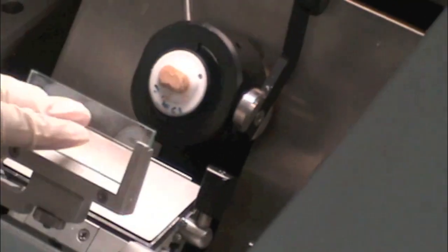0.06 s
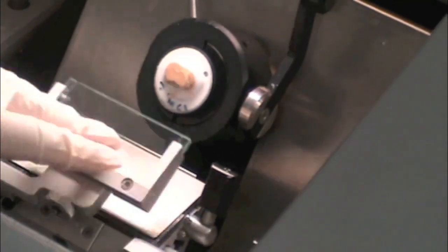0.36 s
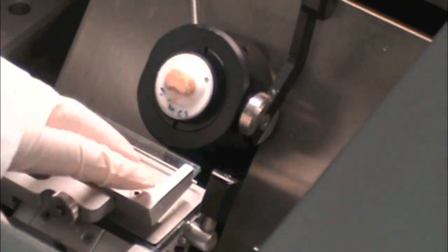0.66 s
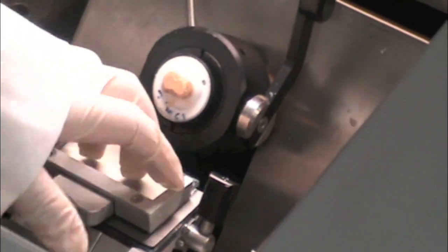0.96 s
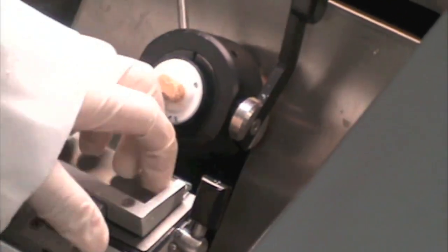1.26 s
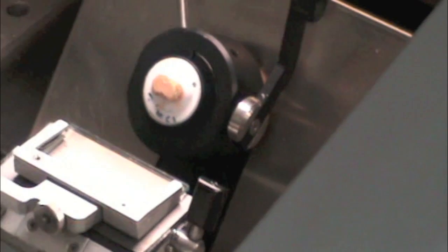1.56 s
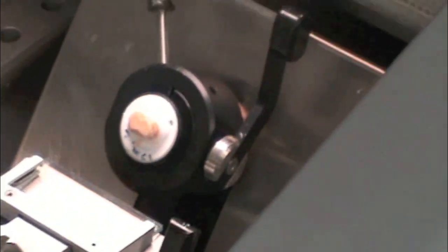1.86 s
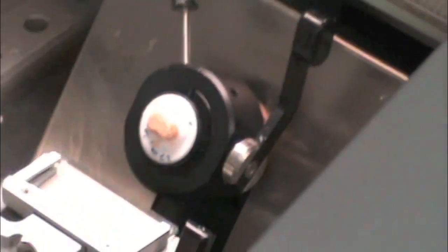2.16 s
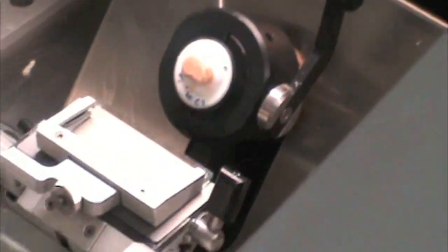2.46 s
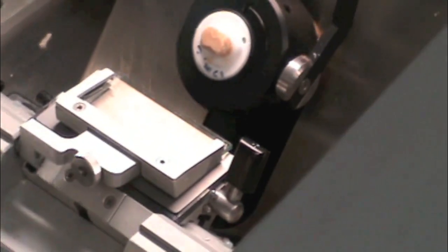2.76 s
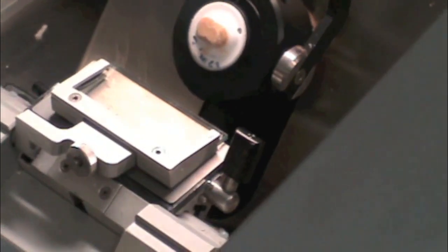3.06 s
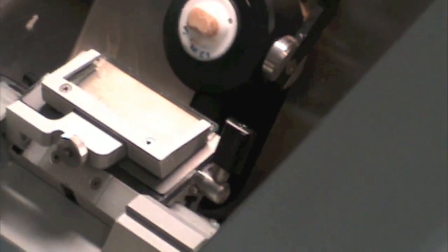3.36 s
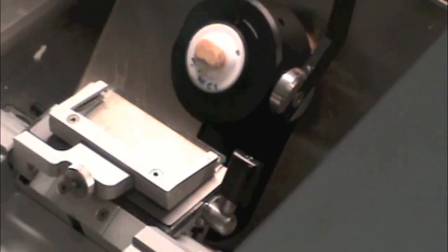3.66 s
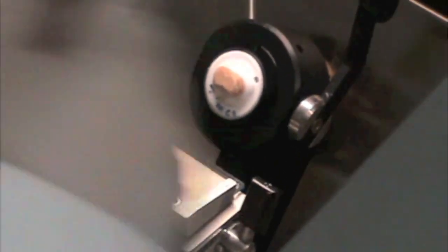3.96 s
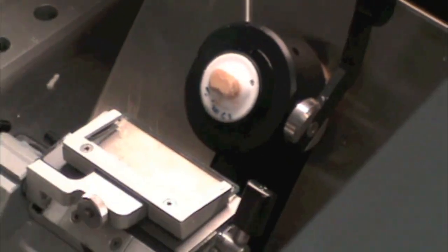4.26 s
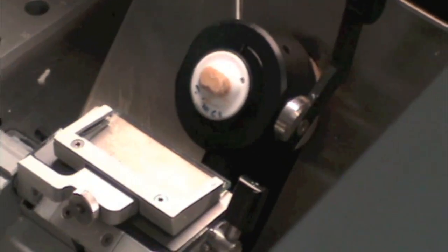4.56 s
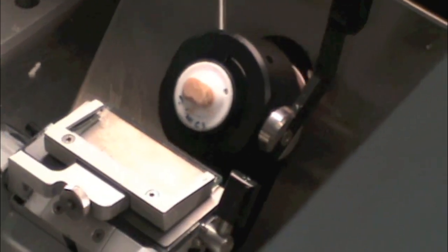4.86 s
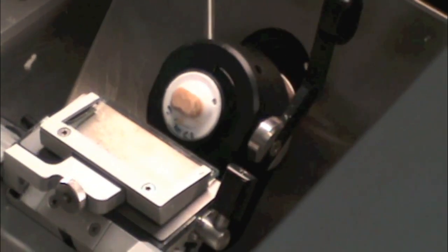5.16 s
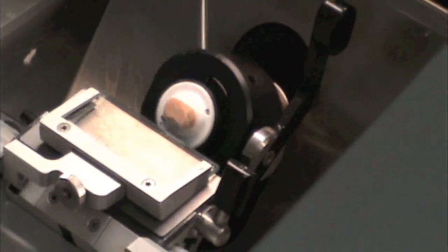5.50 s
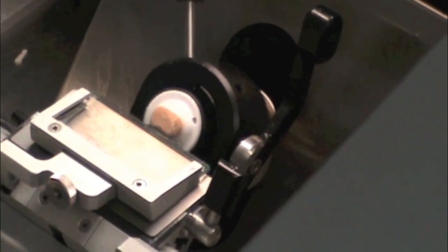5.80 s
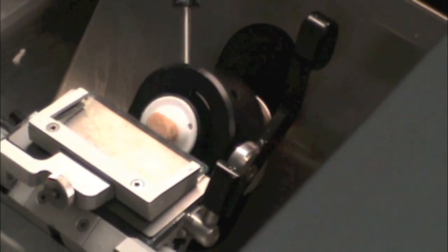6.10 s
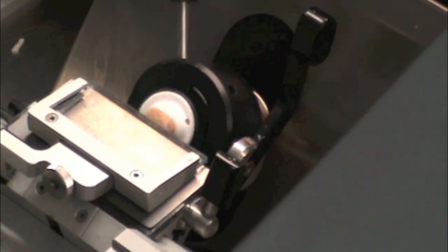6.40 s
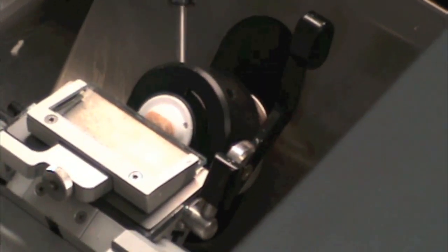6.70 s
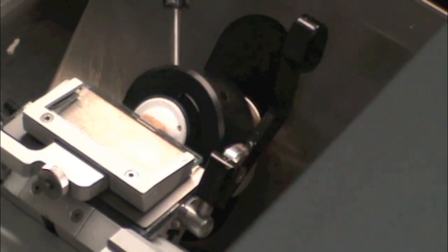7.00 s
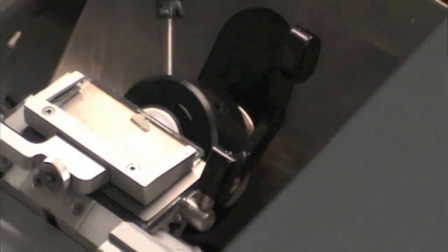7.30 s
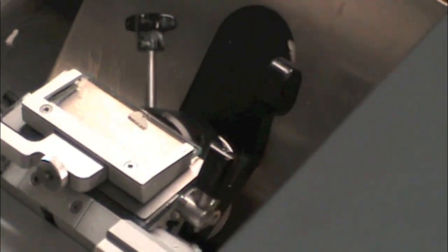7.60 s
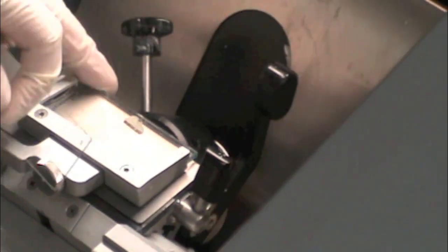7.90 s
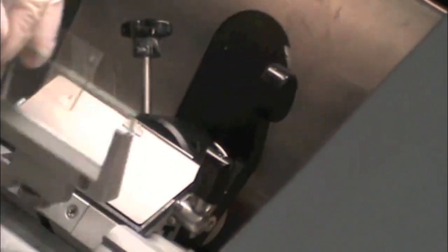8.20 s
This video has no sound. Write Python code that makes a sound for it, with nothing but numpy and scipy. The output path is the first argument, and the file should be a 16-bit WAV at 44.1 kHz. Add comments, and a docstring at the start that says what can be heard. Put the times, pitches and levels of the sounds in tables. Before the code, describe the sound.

A refrigerated lab slicing machine runs steadily, with a wavering low drone, thin high whines and rushing fan air. Near the start a small hinged plate is laid down with a squeaky click. A few faint ticks, rubs and chirps follow, with one squeak and soft knock midway. At the end the plate lifts with a brief shriek and rattle. One nearby microphone in a small lab.

```python
"""A small lab, one microphone by a cryostat. Its compressor drones and whines; a fan moves air through
the cabinet. A gloved hand lays the anti-roll plate on the blade holder, turns the wheel to cut one slice
and lifts the plate again. Glove, plate and slide rub, tick and squeak as they catch and slip; at the
end the hinge shrieks and the plate rattles. The handling rings briefly in the steel chamber."""
import sys
import numpy as np
from scipy import signal
from scipy.fft import rfft, irfft, next_fast_len
from scipy.io import wavfile

SR = 44100
rng = np.random.default_rng(int(sys.argv[2]) if len(sys.argv) > 2 else 0)


def file_out(sig):
    """Save sig as 16-bit WAV at sys.argv[1]."""
    # one column per channel
    cols = np.atleast_2d(sig).T
    # limit, then scale
    lim = np.clip(cols, -1, 1)
    pcm = np.round(lim * 32767).astype(np.int16)
    wavfile.write(sys.argv[1], SR, pcm)


N = 372644
TIME = np.arange(N) / SR
CUTOFF_HZ = 15700


def from_db(db):
    """Decibels to gain."""
    return 10 ** (np.asarray(db) / 20)


def rms_one(x):
    """Scale to an rms of one."""
    return x / np.sqrt(np.mean(x ** 2) + 1e-20)


def at_hz(points, hz):
    """Read a spectrum on a log-frequency axis."""
    known_hz, db = np.transpose(points)
    return np.interp(np.log(np.maximum(hz, 1)), np.log(known_hz), db)


def in_time(points):
    """Read a level curve at every sample."""
    return np.interp(TIME, *np.transpose(points))


def drift(rate, size=N):
    """A smooth random wander with a spread of about one and `rate` turns a second."""
    place = np.arange(size) / SR * rate + rng.random()
    knots = np.sqrt(3) * rng.uniform(-1, 1, int(size / SR * rate) + 3)
    step = place.astype(int)
    ease = (place - step) ** 2 * (3 - 2 * (place - step))
    return knots[step] * (1 - ease) + knots[step + 1] * ease


def resonate(x, hz, width_hz, passes=1):
    """Ring one resonance with a peak gain of one, `passes` times in series."""
    r = np.exp(-np.pi * width_hz / SR)
    feedback = [1, -2 * r * np.cos(2 * np.pi * hz / SR), r * r]
    for _ in range(passes):
        x = signal.lfilter(np.array([1, 0, -1]) * (1 - r * r) / 2, feedback, x)
    return x


def contact(length_s, edge=0.19):
    """Envelope of one contact: it takes hold, holds and lets go; rms one."""
    t = np.arange(int(length_s * SR)) / SR
    ramp = np.clip(np.minimum(t, length_s - t) / (edge * length_s), 0, 1)
    return rms_one(np.sin(np.pi / 2 * ramp) ** 2)


def add(out, start_s, sound):
    """Mix a sound in at start_s."""
    span = out[int(start_s * SR):][:len(sound)]
    span += sound[:len(span)]


def chamber(x, t60_s=0.17, build_up_s=0.0055, wall_hz=7000):
    """Echoes between the steel walls build up and die quickly, a little duller than the direct sound."""
    t = TIME[:SR // 2]
    echoes = rng.standard_normal(len(t)) * from_db(-60 * t / t60_s) * np.minimum(t / build_up_s, 1) ** 2
    walls = signal.butter(1, wall_hz, fs=SR, output="sos")
    return signal.fftconvolve(x, signal.sosfilt(walls, echoes / np.linalg.norm(echoes)))[:N]


def fan(exposure_db, rush_db=-47.5, flutter_db=1.16):
    """Turbulent air rushes and stirs the cabinet; a low band of noise rises and falls irregularly."""
    # moving air: frequency_hz, relative_density_db
    air_spectrum = [(20, -26), (80, -19.5), (112, -16.5), (160, -3), (330, 0), (490, -7.5), (1000, -10),
                    (1600, -17), (2100, -18), (3000, -23.5), (4200, -32), (7700, -34), (11500, -35),
                    (15000, -53.5)]
    # cabinet resonances: pitch_hz, width_hz, base_level_db
    cabinet_modes = [(260.3, 9.5, -61), (329.7, 14.2, -57), (418.8, 7.2, -56.5), (595, 15.5, -60.5),
                     (639.6, 13.8, -58.5), (2065, 64, -65.5), (6760, 270, -72), (8620, 150, -78),
                     (9760, 100, -80), (14250, 250, -99)]
    # low band of noise near 170 Hz: time_s, level_db
    low_band_curve = [(0, -52), (.45, -69), (.9, -51.5), (1.25, -69), (1.6, -51), (1.95, -64.5),
                      (2.95, -52), (3.7, -60.5), (4.6, -57), (6, -66.5), (6.7, -57), (7.7, -71),
                      (8.3, -51.5)]
    size = next_fast_len(N)
    colour = from_db(at_hz(air_spectrum, np.fft.rfftfreq(size, 1 / SR)))
    rush = rms_one(irfft(rfft(rng.standard_normal(size)) * colour, size)[:N])
    turbulence = rng.standard_normal(N)

    def stirred(hz, width_hz):
        """One narrow band of the turbulence; rms one."""
        return rms_one(resonate(turbulence, hz, 2 * width_hz, passes=2))

    rings = sum(from_db(db) * stirred(hz, width) for hz, width, db in cabinet_modes)
    low_band = from_db(in_time(low_band_curve)) * stirred(hz=169.2, width_hz=13)
    return from_db(exposure_db + flutter_db * drift(10)) * (from_db(rush_db) * rush + rings) + low_band


def hum():
    """Steady low hum of the mains, the fan and the compressor's half-speed tone."""
    # hum tones: pitch_hz, level_db
    tones = [(29.5, -95), (120, -70), (149, -64), (360, -59.5)]
    return sum(np.sqrt(2) * from_db(db) * np.sin(2 * np.pi * (hz * TIME + rng.random()))
               for hz, db in tones)


def leading_whines(turns, throb, flutter_db=1.8):
    """Five high shaft harmonics flutter and shift in level with the microphone's position."""
    # whines near 2.7, 5.1, 6.8, 8.5 and 9.7 kHz, each: time_s, base_level_db
    low = [(0, -62.5), (.65, -63), (1.3, -64.5), (1.8, -71.5), (3.2, -67), (4.4, -69), (5.3, -74),
           (8.2, -75)]
    mid = [(0, -87), (.6, -79), (1.2, -69.5), (1.9, -81), (2.1, -66.5), (4.9, -69.5), (6, -73.5),
           (6.8, -73.5), (8, -75)]
    high = [(0, -67), (.5, -60), (1.3, -67.5), (1.5, -70), (2, -71), (2.25, -65.5), (4.5, -66), (6.1, -73),
            (7.5, -71), (8.2, -65)]
    shrill = [(0, -71), (.8, -64), (1.6, -73), (2.1, -69.5), (4.9, -70), (5.3, -77), (6, -88), (6.6, -80),
              (7.4, -73), (8.2, -69)]
    thin = [(0, -75), (1.65, -88), (1.85, -70), (3.9, -82), (5.2, -76), (8.2, -74)]

    def whine(harmonic, curve, throb_depth):
        """One tone locked to the shaft."""
        gain = np.sqrt(2) * from_db(in_time(curve) + flutter_db * drift(16)) * (1 + throb_depth * throb)
        return gain * np.sin(2 * np.pi * (harmonic * turns + rng.random()))

    return (whine(46, low, 0) + whine(87, mid, .24) + whine(116, high, .05)
            + whine(145, shrill, .1) + whine(164, thin, .15))


def compressor(exposure_db, shaft_hz=58.94, mains_hz=60, wobble_hz=0.0146, throb_peak_s=4.42,
               wander=0.23, uneven_db=7.5, waver_db=2.2):
    """Every piston stroke shakes the shell alike, making a buzz whose partials waver and throb."""
    # outline of the buzz: frequency_hz, base_level_db
    buzz_spectrum = [(59, -79), (180, -72), (400, -59), (650, -108), (800, -71.5), (1300, -82.5),
                     (2200, -86), (3100, -101), (3900, -90), (5800, -99), (6700, -92), (9700, -99),
                     (11400, -100), (12800, -99), (15000, -115)]
    # partials on a resonance of shell or panels: harmonic, base_level_db
    drone_partials = [(3, -67), (5, -52), (6, -64), (7, -69), (9, -68.5), (10, -73), (11, -73.5)]
    # high partials that the shell favours: harmonic (the nearest is used), base_level_db, throb_depth
    whine_partials = [(33, -68.5, 0.1), (34, -74, 0), (35, -72.5, 0.14), (36, -87, 0), (43, -67.5, 0),
                      (76.1, -79, 0.04), (79.3, -84, 0.2), (81, -85, 0.5), (83.5, -76, 0), (85.9, -77, 0.1),
                      (91.4, -77.5, 0), (108, -92, 0.2), (112, -76, 0.1), (113.6, -69.5, 0), (120, -79, 0),
                      (126, -80.5, 0), (140, -82, 0.1), (142, -82, 0.2), (146.2, -77, 0), (151, -86, 0.1),
                      (164, -89, 0.3), (166, -86, 0.2), (168, -84, 0), (193, -85, 0.4), (194, -78.5, 0),
                      (196, -86, 0.2)]
    # swell of the strongest partial: time_s, gain_db
    drone_curve = [(0, 8), (.2, 3.5), (.43, -13), (.58, 13), (.9, 1.5), (1.08, 0.5), (1.8, -7), (2.0, 5),
                   (2.25, -10), (2.65, -5), (3.5, -4), (4.25, -0.5), (4.45, 2), (5.1, -1.5), (5.3, 3),
                   (5.6, -2.5), (6.15, -7), (6.35, 1), (7.0, 0.5), (7.6, -7), (7.95, 1.5), (8.35, 3.5)]
    drone_db = in_time(drone_curve) + waver_db * drift(9)
    harmonics = np.arange(1, 255)
    hz = harmonics * shaft_hz
    level_db = at_hz(buzz_spectrum, hz) + uneven_db * (2 * rng.random(len(hz)) - 1)
    throb_depth = np.full(len(hz), .3)
    for harmonic, db in drone_partials:
        level_db[np.argmin(abs(harmonics - harmonic))] = db
    for harmonic, db, depth in whine_partials:
        nearest = np.argmin(abs(harmonics - harmonic))
        level_db[nearest], throb_depth[nearest] = db, depth
    partials = from_db(level_db) * np.exp(2j * np.pi * rng.random(len(hz)))
    turns = np.cumsum(shaft_hz + wobble_hz * drift(5)) / SR
    throb_hz = 2 * (mains_hz - shaft_hz)   # the motor lags behind the mains
    throb = np.cos(2 * np.pi * throb_hz * (TIME - throb_peak_s))

    def cycle(weights, size=4096):
        """Repeat one stroke at the speed of the shaft."""
        shape = irfft(np.r_[0, weights], size) * size / np.sqrt(2)
        return np.interp(turns % 1 * size, np.arange(size + 1), np.r_[shape, shape[0]])

    def wavering(weights):
        """A steady stroke plus two copies with random phases that come and go."""
        changes = sum(cycle(weights * np.exp(2j * np.pi * rng.random(len(weights)))) * drift(7)
                      for _ in range(2))
        return cycle(weights) + wander * changes

    def throbbing(weights):
        """Each partial swells with the motor's slip by its own depth."""
        return wavering(weights) + throb * cycle(weights * throb_depth)

    # the strongest partial stands in the room and the high ones beam, so they change with position
    strongest, high = harmonics == 5, hz > 2400
    drone = from_db(drone_db) * wavering(partials * strongest)
    whine = from_db(exposure_db) * throbbing(partials * high) + leading_whines(turns, throb)
    buzz = throbbing(partials * ~(strongest | high))
    return drone + whine + buzz


def rubs(catches_per_s=7000, spread_db=5.5):
    """Tiny catches of two surfaces ring the holder; soft contacts reach only its low modes."""
    # glove, sleeve and parts rubbing: start_s, length_s, level_db, low_hz, high_hz
    strokes = [(0.412, 0.049, -36.5, 2750, 3300), (0.424, 0.033, -38.5, 2400, 2780),
               (0.425, 0.027, -44, 8000, 9800), (0.438, .012, -53, 13600, 14800),
               (.44, .018, -56, 10300, 11200), (1.783, 0.066, -62, 1500, 5000),
               (2.075, 0.033, -48, 1000, 1980), (2.075, 0.031, -60, 3200, 9600),
               (2.076, 0.0085, -56.5, 3000, 9400), (3.243, 0.038, -63.5, 3000, 10000),
               (3.293, 0.022, -63.5, 5230, 6600), (4.241, 0.052, -51.5, 500, 1910),
               (4.272, .02, -62, 5500, 7000), (4.411, 0.036, -41.5, 845, 1360),
               (4.421, .02, -41, 2130, 2530), (4.419, .02, -57, 2750, 2950),
               (4.848, 0.026, -53.5, 500, 1500), (7.623, 0.049, -51, 550, 1500),
               (8.13, 0.34, -48, 148, 263), (8.321, .025, -41, 12600, 14200),
               (8.337, 0.023, -39, 3000, 3400), (8.357, 0.045, -41, 2870, 3600),
               (8.362, 0.027, -37.5, 5000, 9600), (8.361, 0.066, -36.5, 1470, 1800),
               (8.387, .04, -44, 7500, 9600), (8.357, 0.038, -55, 12400, 14600)]
    # modes of the blade holder and its plate: pitch_hz, width_hz, gain_db
    holder_modes = [(600, 220, 3), (994, 104, 8), (1366, 140, 7), (1780, 720, 8), (2220, 590, 8),
                    (3170, 200, 8.5), (5000, 510, 4), (6750, 610, 1), (7800, 890, 3), (8800, 910, 6),
                    (10900, 630, 2.5), (13600, 380, -10), (14200, 1100, -14)]
    out = np.zeros(N)
    for start_s, length_s, db, low_hz, high_hz in strokes:
        envelope = contact(length_s)
        n = len(envelope)
        catches = (rng.random(n) < catches_per_s / SR) * rng.choice([-1, 1], n)
        strength = from_db(spread_db * (2 * rng.random(n) - 1))
        force = np.r_[catches * strength * envelope, np.zeros(512)]   # time to ring out
        body = sum((-1) ** k * from_db(mode_db) * resonate(force, hz, width)
                   for k, (hz, width, mode_db) in enumerate(holder_modes))
        sound = signal.sosfilt(signal.butter(2, [low_hz, high_hz], "band", fs=SR, output="sos"), body)
        add(out, start_s, from_db(db) * rms_one(sound) * np.sqrt(len(sound) / n))
    return out


def ticks():
    """Small contacts: each swells and dies on one note, the high ones at once, the low one slower."""
    # taps of plate, fingers and slide: start_s, pitch_hz, peak_db, rise_s
    taps = [(0.4266, 3100, -34, 0.0014), (0.4364, 2320, -25, 0.0011), (.4425, 3100, -35, .0006),
            (0.4422, 9000, -27, .0004), (.448, 4800, -33, .0012), (.971, 4350, -51, .0008),
            (1.192, 4330, -34.5, 0.0018), (1.199, 4500, -35.5, .001), (1.902, 5500, -40, 0.00094),
            (3.263, 9300, -54, 0.00045), (3.315, 4280, -47, .0005), (3.322, 4000, -47, .0005),
            (4.441, 595, -30.5, 0.01), (7.987, 4800, -51, .001)]
    out, t = np.zeros(N), TIME[:SR // 10]
    for start_s, hz, db, rise_s in taps:
        envelope = t / rise_s * np.exp(1 - t / rise_s)
        add(out, start_s, from_db(db) * envelope * np.sin(2 * np.pi * hz * t))
    return out


def stick_slip(length_s, hz, roughness, fall_db, grip_db, grips_per_s=300, glide_octaves=0, swell_db=0):
    """Surfaces stick and slip: an unsteady pitch with falling overtones under an uneven grip."""
    envelope = contact(length_s)
    size = len(envelope)
    progress = np.linspace(-.5, .5, size)
    pitch_hz = hz * 2 ** (glide_octaves * progress) * (1 + roughness * drift(650, size))
    phase = 2 * np.pi * np.cumsum(pitch_hz) / SR
    harmonics = np.arange(1, max(int(CUTOFF_HZ / hz), 1) + 1)[:, None]
    gains = from_db(-fall_db * np.log2(harmonics))
    tone = np.sum(gains * np.sin(harmonics * phase + 2 * np.pi * rng.random(harmonics.shape)), axis=0)
    grip = from_db(swell_db * progress + grip_db * drift(grips_per_s, size))
    return envelope * rms_one(tone * grip)


def squeaks():
    """Glove, plate and slide slip in short chirps that may glide."""
    # chirps: start_s, length_s, pitch_hz, level_db, fall_db_per_octave, roughness, glide_octaves
    chirps = [(0.416, 0.031, 2915, -26, 22, 0.0097, -0.017), (0.424, 0.019, 2405, -32, 33, 0.054, 0),
              (0.413, 0.025, 6400, -44, 35, .006, 0), (0.42, .016, 5670, -44, 35, .02, 0.011),
              (.415, 0.013, 8950, -44, 35, .012, .04), (.425, .014, 8150, -43, 35, .015, 0),
              (0.434, 0.033, 4960, -43.5, 35, .04, -0.014), (0.524, 0.015, 3350, -40, 24, .05, 0),
              (0.537, 0.0128, 3240, -32.5, 18.5, 0.011, 0), (4.23, .085, 3450, -61, 25, 0.023, -0.017),
              (4.411, 0.033, 2465, -33.5, 50, 0.024, .12), (4.422, 0.015, 1020, -37, 25, 0.036, 0),
              (4.863, 0.029, 473, -44.5, 14, .043, 0.027), (7.641, 0.03, 1288, -41.5, 40, 0.053, -.07),
              (8.119, 0.015, 6090, -40, 52, 0.01, -0.0062), (8.138, 0.057, 5180, -47, 38, .015, -0.014),
              (8.143, 0.052, 6120, -45.5, 59, 0.017, -0.0069), (8.156, 0.018, 5000, -39, 38, 0.012, 0.032),
              (8.198, .022, 4800, -54, 42, 0.049, 0.023), (8.236, 0.069, 1816, -37, 38, 0.051, 0.11),
              (8.245, 0.015, 3540, -53, 38, .015, .05)]
    out = np.zeros(N)
    for start_s, length_s, hz, db, fall_db, roughness, glide in chirps:
        chirp = stick_slip(length_s, hz, roughness, fall_db, grip_db=3.5, glide_octaves=glide)
        add(out, start_s, from_db(db) * chirp)
    return out


def clatter(spread_db=1.0):
    """The lifted plate rattles on its hinge; each knock strikes every mode with its own strength."""
    # knocks on the hinge: start_s, peak_db
    knocks = [(8.362, -18), (8.367, -17), (8.374, -17), (8.380, -18), (8.387, -20), (8.402, -27)]
    # modes of the loose plate: pitch_hz, width_hz, gain_db
    plate_modes = [(3000, 220, -5), (3300, 250, -3), (5000, 240, -8), (5500, 210, -2), (7200, 260, 2),
                   (7750, 260, -2), (8400, 260, -4), (9270, 380, 5), (10600, 240, 3), (12300, 240, -9),
                   (14300, 400, -23)]
    out, click = np.zeros(N), signal.unit_impulse(2048)
    for start_s, db in knocks:
        ring = sum(rng.choice([-1, 1]) * from_db(mode_db + spread_db * rng.standard_normal())
                   * resonate(click, hz, width, passes=2) for hz, width, mode_db in plate_modes)
        add(out, start_s, from_db(db) * ring / np.max(abs(ring)))
    return out


def hinge(lift_s=8.343, lead_s_per_khz=0.0017):
    """As the plate lifts, the hinge shrieks in its modes, highest first, and breaks into a judder."""
    # modes of the hinge: pitch_hz, level_db, length_s
    hinge_modes = [(4750, -32.5, 0.014), (7100, -34, 0.017), (8760, -30, .03), (8950, -17.5, 0.038),
                   (10870, -30, 0.017), (12700, -31, .016)]
    # rough slips: start_s, length_s, pitch_hz, level_db, roughness, fall_db_per_octave
    judders = [(8.332, 0.023, 1637, -28, 0.074, 5.5), (8.357, 0.031, 1708, -29.5, 0.088, 11),
               (8.359, 0.06, 9000, -34, 0.015, 31), (8.397, 0.0092, 1746, -33, .06, 22)]
    out = np.zeros(N)
    for hz, db, length_s in hinge_modes:
        shriek = stick_slip(length_s, hz, roughness=0.0067, fall_db=30, grip_db=5, swell_db=1)
        add(out, lift_s - lead_s_per_khz * hz / 1000, from_db(db) * shriek)
    for start_s, length_s, hz, db, roughness, fall_db in judders:
        judder = stick_slip(length_s, hz, roughness, fall_db, grip_db=4, grips_per_s=523)
        add(out, start_s, from_db(db) * judder)
    return out


def scene(follow=0.87, echo_db=-6, tick_echo_db=-8):
    """The running machine, with the handling and its echoes on top, in mono."""
    # how openly the machine reaches the microphone: time_s, relative_level_db
    exposure_curve = [(0.0, -55.5), (0.2, -58.5), (0.61, -56), (1.06, -59.5), (1.6, -60.5), (2.44, -59.5),
                      (3.99, -61.5), (4.42, -58), (5.03, -61), (5.35, -61.5), (6.16, -64), (6.72, -61),
                      (7.47, -64), (7.81, -59.5), (8.1, -59.5)]
    openness_db = in_time(exposure_curve)
    exposure_db = follow * (openness_db - openness_db.mean())
    machine = compressor(exposure_db) + hum() + fan(exposure_db)
    handling = squeaks() + hinge() + rubs() + clatter()
    taps = ticks()
    echoes = chamber(from_db(echo_db) * handling + from_db(tick_echo_db) * taps)
    return (machine + handling + taps + echoes)[None]


def record(dry):
    """A steep low-pass cuts the highest treble."""
    return signal.sosfilt(signal.ellip(12, .1, 80, CUTOFF_HZ, fs=SR, output="sos"), dry)


dry = scene()
out = record(dry)
file_out(out)
```